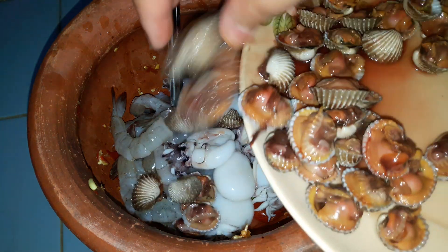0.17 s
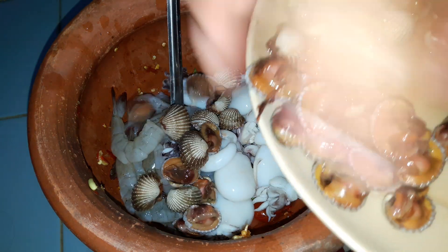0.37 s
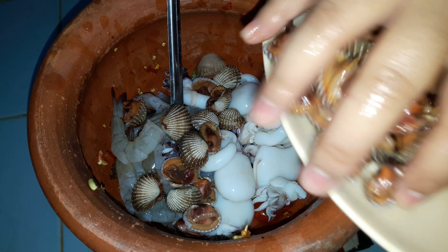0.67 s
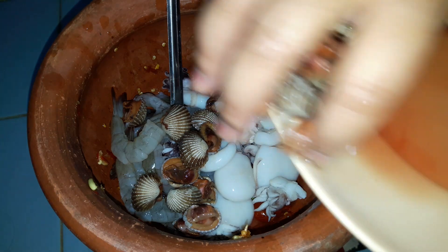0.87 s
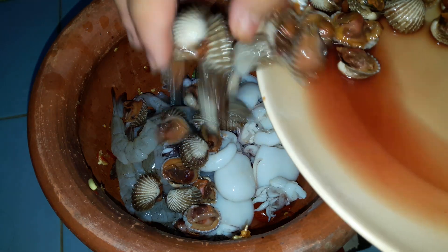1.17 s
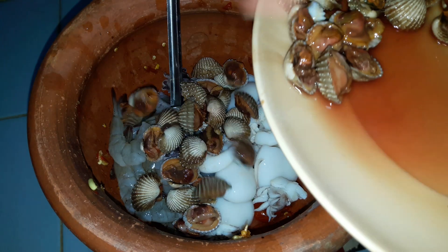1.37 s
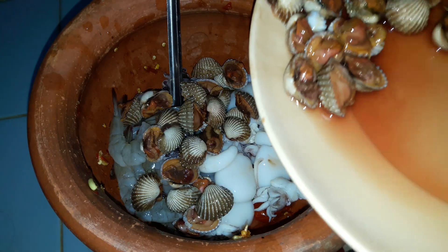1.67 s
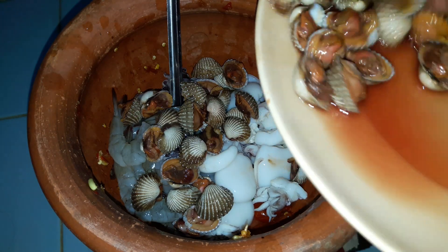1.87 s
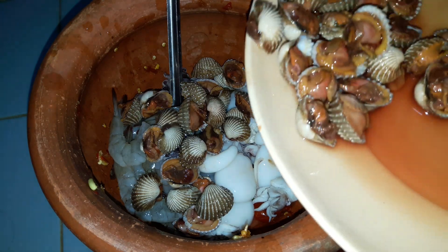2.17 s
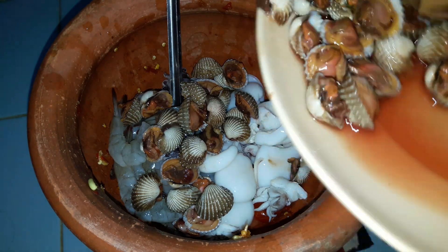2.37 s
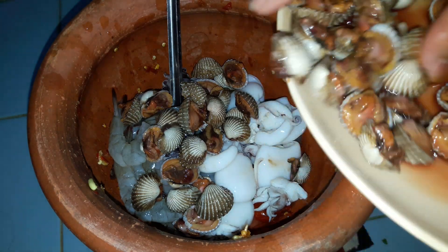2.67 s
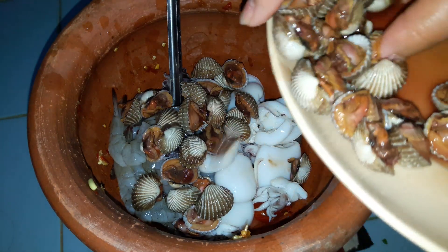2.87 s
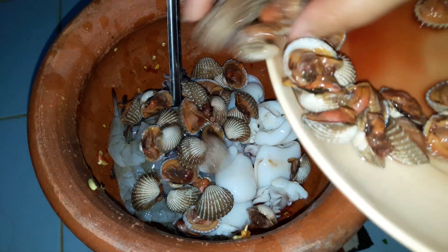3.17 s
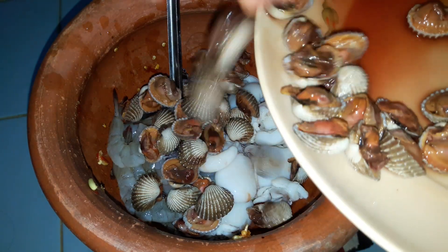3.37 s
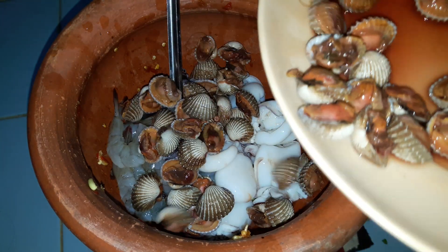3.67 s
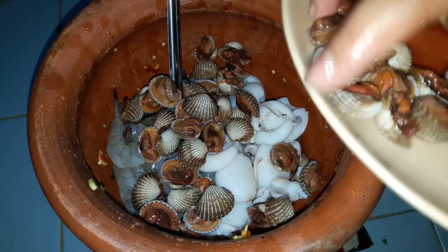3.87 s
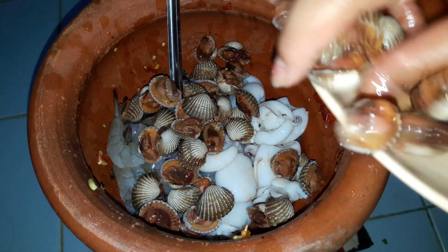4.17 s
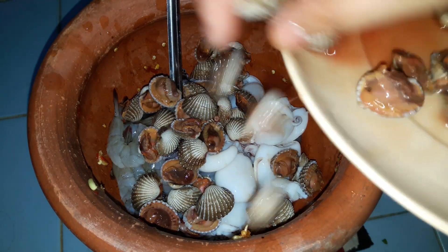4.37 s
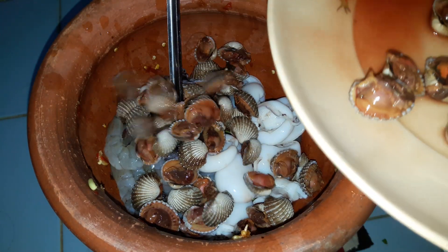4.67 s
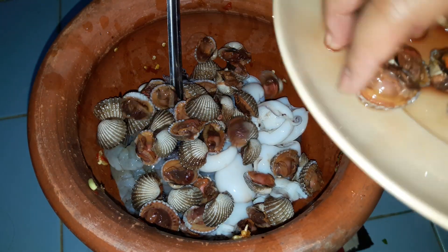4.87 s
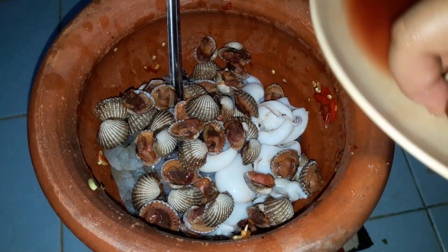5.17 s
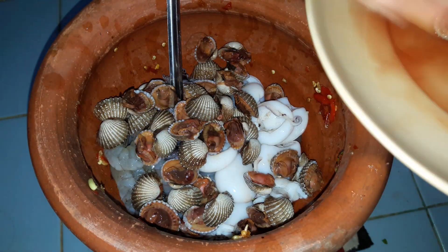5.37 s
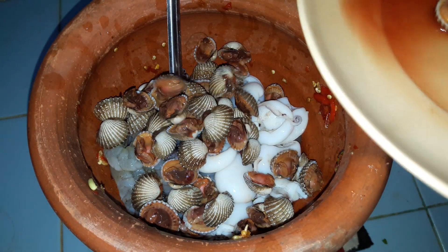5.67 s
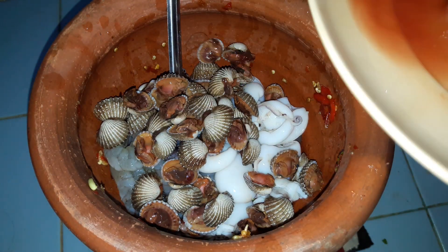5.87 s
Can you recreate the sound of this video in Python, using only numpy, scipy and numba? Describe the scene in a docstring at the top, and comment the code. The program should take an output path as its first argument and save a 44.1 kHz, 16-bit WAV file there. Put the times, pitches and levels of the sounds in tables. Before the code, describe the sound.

Cockles in their shells are pushed off a ceramic plate into a clay mortar in a small kitchen. The sliding heap rattles and knocks dully on the plate, while falling handfuls clack brightly on other shells to the left. The clatter comes in several bursts with sliding between them, thinning near the end. A few landings thump the close left microphone, over a short echo and a faint low rumble.

```python
"""In a small kitchen, cockles in their shells are pushed off a ceramic plate into a clay mortar.
Sliding shells rattle and knock on the plate (dull, slightly right) and clack on each other in the
mortar (bright, to the left). Each hit is a handful of fading tones; hard hits add a crack of noise.
One shell clack leaves a faint, high ring near 9 kHz, and a few landings jolt the left microphone.
The bowl and walls add a short echo, and a low rumble lies underneath."""
import sys
import numpy as np
from scipy import signal
from scipy.fft import rfft, irfft
from scipy.io import wavfile
from numba import njit

SR = 44100
rng = np.random.default_rng(int(sys.argv[2]) if len(sys.argv) > 2 else 0)


def generate_wav(signal):
    """Clip the signal to [-1, 1] and save it as 16-bit WAV at the path in sys.argv[1]."""
    frames = np.transpose(np.atleast_2d(signal))
    scaled = np.clip(frames, -1, 1) * 32767
    pcm = np.round(scaled).astype(np.int16)
    wavfile.write(sys.argv[1], SR, pcm)


N = 265878


def from_db(db):
    """Turn decibels into a number to multiply by."""
    return 10 ** (np.asarray(db) / 20)


def rms_one(x):
    """Scale a sound so that its average strength (rms) is 1."""
    return x / np.sqrt(np.mean(x ** 2) + 1e-20)


def to_samples(seconds):
    """Turn seconds into sample numbers."""
    return (seconds * SR).astype(np.int64)


def only(x, side, hz, order=2):
    """Keep the "low" or the "high" side of a sound, split at hz."""
    return signal.sosfilt(signal.butter(order, hz, side, fs=SR, output="sos"), x)


@njit
def add_tones(out, at, size, turn, fade, phase, rise):
    """Add one tone per hit, pitch and side. It swells during the contact, then fades away."""
    for hit in range(size.shape[0]):
        for tone in range(size.shape[1]):
            step = fade[tone] * np.exp(1j * turn[hit, tone])
            end = min(out.shape[1], at[hit, tone] + int(-5.0 / np.log(fade[tone])))  # 43 dB down
            for side in range(2):
                wave = size[hit, tone, side] * np.exp(1j * phase[hit, tone, side])
                held_back = 1.0
                for n in range(at[hit, tone], end):
                    held_back *= rise
                    out[side, n] += wave.imag * (1 - held_back)
                    wave *= step


PLATE_LAG_S, MORTAR_LAG_S = 0.000413, -0.00011  # how much later the left side hears each place


def strike(tones, start_s, level_db, left_db, lag_s, chatter_s, contact_s, spread_db, detune,
           pitch_hz=None):
    """Each hit meets a new spot and load of shells, so its tones vary. left_db is left minus right."""
    hz, tone_db, ring_s = np.transpose(tones)  # ring_s is the time to fade by 60 dB
    chance = rng.standard_normal((len(start_s), len(hz), 5))
    hz = np.minimum(hz * (1 + detune * chance[..., 0]), .45 * SR)
    tone_db = tone_db + spread_db * chance[..., 1]
    if pitch_hz is not None:  # the struck spot brings out one pitch and its neighbours
        distance = np.abs(np.log(hz / pitch_hz[:, None]))
        nearest = distance == distance.min(axis=1, keepdims=True)
        hz = np.where(nearest, pitch_hz[:, None], hz)
        tone_db = tone_db + 4 * np.exp(-(distance / .35) ** 2) + 3.5 * nearest
    size = from_db(tone_db)
    size *= from_db(level_db)[:, None] / np.sqrt(np.sum(size ** 2, axis=1, keepdims=True))
    at = to_samples(start_s[:, None] + chatter_s * chance[..., 2] ** 2)  # shell ribs touch in turn
    # Higher tones reach the two sides more out of step, and lean further left.
    out_of_step = hz / 1750 * chance[..., 3] - 2 * np.pi * np.maximum(hz - 613, 0) * lag_s
    phase = 2 * np.pi * chance[..., 4:] + out_of_step[..., None] * [.5, -.5]
    left_db = left_db[:, None] + 1.5 * np.log2(hz / np.median(hz))
    size = size[..., None] * from_db(left_db[..., None] * [.5, -.5])
    out = np.zeros((2, N))
    add_tones(out, at, size, turn=2 * np.pi * hz / SR, fade=from_db(-60 / (ring_s * SR)),
              phase=phase, rise=np.exp(-1 / (contact_s * SR)))
    return out


def crack(start_s, level_db, left_db, top_hz=8900, fade_s=0.0097):
    """Hard things meet with a dry crack: bright noise that dies at once."""
    hits = np.zeros((2, N))
    hits[:, to_samples(start_s)] = from_db(level_db + left_db * [[.5], [-.5]])
    fade = from_db(-60 / (fade_s * SR))
    bursts = signal.lfilter([1], [1, -fade], hits + 1e-18) * rng.standard_normal((2, N))
    return only(only(bursts, "high", 2500), "low", top_hz)


def touches(per_s, left_db, uneven_db):
    """Small random touches, a few of them strong: their start_s, level_db and left_db."""
    at = np.flatnonzero(rng.random(N) < per_s / SR)
    return at / SR, uneven_db * np.minimum(rng.exponential(1, len(at)), 3), left_db[at]


def surges(rows, rise_s=.006, fall_db_per_s=266, hop=32):
    """Bursts start fast, drift and die. Gives their total strength and the loudest one's other columns."""
    start_s, length_s, db, drop_db, *others = np.transpose(rows)[..., None]
    age_s = np.arange(0, N, hop) / SR - start_s
    db = db - drop_db * np.clip(age_s / length_s, 0, 1)
    db -= fall_db_per_s * np.maximum(age_s - length_s, 0)
    gain = from_db(db) * np.clip(1 + age_s / rise_s, 0, 1)
    loudest = gain.argmax(axis=0)
    curves = [gain.sum(axis=0)] + [column[loudest, 0] for column in others]
    return [np.repeat(curve, hop)[:N] for curve in curves]


# How strong the rumble is from low to high: pitch_hz, relative_db
RUMBLE_COLOUR = [(24, -48), (40, -19), (117, 0.5), (224, -8), (325, -9.5), (591, -13), (704, -9.5),
                 (1380, -88), (2640, -13.5), (15500, -103)]
# How loud the rumble is over time: time_s, level_db
RUMBLE_LEVELS = [(0, -54), (2.0, -60), (2.2, -66), (2.8, -62.5), (2.9, -50), (3.25, -54.5), (3.35, -59),
                 (4.3, -65.5), (6.03, -64)]


def rumble():
    """Low kitchen noise that swells and sinks, nearly the same on both sides in the bass."""
    hz = np.arange(N // 2 + 1) * SR / N + 1
    pitch_hz, relative_db = np.transpose(RUMBLE_COLOUR)
    colour = from_db(np.interp(np.log(hz), np.log(pitch_hz), relative_db))
    both, apart = rfft(rng.standard_normal((2, N))) * colour
    apart *= np.sqrt(0.05 + (hz / 900) ** 2) / np.sqrt(1 + (hz / 900) ** 2)
    level_db = np.interp(np.arange(N) / SR, *np.transpose(RUMBLE_LEVELS))
    return from_db(level_db) * rms_one(irfft([both + apart, both - apart], N))


# The tones the plate rings with: pitch_hz, relative_db, ring_s
PLATE_TONES = [(346, -15.5, 0.019), (478, -17, 0.035), (708, -9, 0.035), (792, -6, 0.043),
               (938, -5.5, 0.053), (1160, -1.5, 0.031), (1271, -1.5, 0.031), (1538, 2, 0.032),
               (1740, 5, 0.019), (1950, 2, 0.041), (2216, 0, 0.014), (2413, 12.5, 0.0094),
               (2526, -1, 0.029), (2740, -2, 0.034), (3179, 1.5, 0.016), (3286, 7.5, 0.0033),
               (3846, -2.5, 0.022), (4320, -6, 0.03), (5190, -2.5, 0.011), (7130, -2.5, 0.0055),
               (10060, -15, 0.0046)]
# Slides of the heap: start_s, length_s, level_db, drop_db, left_db, pitch_hz, ticks_quieter_db
SLIDES = [(0.0, 0.24, -26, 9, 0.5, 2310, 15.5), (.575, 0.13, -37.5, 2.5, -2, 1496, 17),
          (.73, 0.38, -40, -2.5, -0.5, 2586, 10), (1.16, 0.26, -40.5, 9.5, 1, 2705, 11),
          (1.52, 0.14, -70, -4, 2, 2400, 2.5), (1.69, 0.3, -32, -0.5, -1, 1300, 12),
          (2.03, 0.21, -33.5, 17.5, -1.5, 947, 20), (2.26, .1, -50.5, 1, -1.5, 965, 23),
          (2.385, .3, -33, 0.5, -0.5, 963, 10.5), (2.7, 0.22, -33.5, 4.5, -0.5, 960, 12),
          (3.01, 0.27, -32, -4.5, -1, 2500, 12.5), (3.35, 0.34, -34, 6.5, 0, 2280, 13),
          (3.75, 0.1, -40, 6, -3.5, 2400, 26), (3.85, .16, -28, 8, -0.5, 2270, 13),
          (4.072, 0.28, -34, -1.5, -2, 2390, 13.5), (4.39, 0.47, -33, 10.5, 0.5, 2500, 14),
          (4.92, 0.085, -42.5, -2, -1, 1226, 22), (5.03, 0.26, -30.5, 10.5, -2.5, 2350, 27.5),
          (5.385, 0.05, -36.5, 2.5, -2.5, 2390, 42), (5.51, 0.11, -41, 13, -3.5, 1310, 34),
          (5.63, 0.18, -40, 9, 3, 1210, 8), (5.85, 0.17, -55, -16, -4, 1210, 20)]


def plate_rattle():
    """The sliding heap taps the plate so often that the taps blur into a rattle."""
    slide, left_db, slide_hz, _ = surges(SLIDES)
    start_s, level_db, left_db = touches(1300, left_db, uneven_db=6.5)
    pitch_hz = slide_hz[to_samples(start_s)] * (1 + .08 * rng.standard_normal(len(start_s)))
    rattle = strike(PLATE_TONES, start_s, level_db, left_db, PLATE_LAG_S, chatter_s=.001,
                    contact_s=.00034, spread_db=5.5, detune=.0693, pitch_hz=pitch_hz)
    return slide * rms_one(rattle)


# The tones a shell rings with: pitch_hz, relative_db, ring_s
SHELL_TONES = [(1270, 6, 0.0034), (2145, -5, 0.014), (3368, 0.5, 0.02), (4220, 0.5, 0.0062),
               (4680, -2, 0.016), (6090, -2, 0.018), (6260, -11.5, 0.0055), (7750, -5.5, 0.0037),
               (8200, -2, 0.033), (8755, -3, 0.019), (9730, -12, 0.033), (10720, 5.5, 0.005),
               (11890, -0.5, 0.013), (13230, -5, 0.0056), (13660, -3.5, 0.0052), (14700, 13.5, 0.00061)]
# Handfuls scattering in the mortar: start_s, length_s, level_db, drop_db, left_db
HANDFULS = [(0.0, .42, -38.5, 7.5, 0), (1.17, .13, -44.5, -1, 2), (1.315, 0.088, -33.5, 8, 5),
            (3.24, 0.084, -39.5, 2, 0), (3.365, 0.078, -32, 7.5, 3.5), (3.48, .16, -46.5, 2, 4.5),
            (4.46, 0.06, -42, 10, 12), (4.68, 0.18, -56, -4, 4), (5.69, 0.079, -37.5, 14.5, -0.5)]


def shell_ticks():
    """Thin shells tick against each other as they slide on the plate and scatter in the mortar."""
    slide, plate_left_db, _, quieter_db = surges(SLIDES)
    slide = slide * from_db(-quieter_db)
    scatter, mortar_left_db = surges(HANDFULS)
    ticks = touches(450, np.where(scatter > slide, mortar_left_db, plate_left_db), uneven_db=7)
    ring = strike(SHELL_TONES, *ticks, MORTAR_LAG_S, chatter_s=.00059,
                  contact_s=.00036, spread_db=1.5, detune=.081)
    ticking = rms_one(ring) + from_db(.5) * rms_one(crack(*ticks))
    return (slide + scatter) * rms_one(ticking)


# Shell landing on shell: start_s, level_db, pitch_hz, left_db
CLACKS = [(0.0034, -13, 9230, 9), (0.0211, -10, 5900, 1.5), (0.1192, -7, 12450, 5), (0.162, -9.5, 11200, 8),
          (0.1653, -8, 6300, 3), (0.2258, -13, 11700, 11), (0.286, -13.5, 7100, 9), (0.308, -24, 4500, 6),
          (0.3202, -11.5, 10140, 5.5), (0.3461, -15, 9600, 9), (0.3602, -12, 9060, 12.5),
          (0.4823, -27.5, 9430, 14.0), (0.5546, -30.5, 10000, 13), (1.1705, -20, 4440, 7.0),
          (1.2042, -29, 10800, 16), (1.2228, -16, 4550, -0.5), (1.2655, -12.5, 9500, 6.5),
          (1.3144, -18, 5740, 7.0), (1.3196, -9.5, 5600, 7.0), (1.3397, -12.5, 10400, 6),
          (1.3475, -12, 10900, 7), (1.3654, -12, 10700, 7), (1.3872, -13.5, 8940, 9),
          (1.4341, -24, 11500, 5.5), (1.9944, -16, 8200, -0.5), (2.5363, -20, 8200, 2),
          (3.018, -20.5, 13900, 10.0), (3.048, -15.5, 8560, 2), (3.1572, -12, 5200, 0),
          (3.258, -11.5, 4910, 4), (3.2822, -20, 11500, 5.0), (3.2997, -11.5, 10000, 8),
          (3.3664, -10, 11700, 7), (3.3722, -10, 8400, 1), (3.383, -4, 11100, 11),
          (3.3923, -14, 11300, 4.5), (3.4829, -11.5, 12000, 7.0), (3.5168, -11.5, 9000, 10.0),
          (3.5609, -11.5, 8470, 8.5), (3.6229, -16, 10900, 13), (3.6386, -21, 10000, 10),
          (3.689, -22.5, 8950, 7.5), (4.2782, -23, 8300, 3), (4.358, -17, 5000, -1),
          (4.4862, -13.5, 7000, -9), (4.5083, -13, 4590, 8), (4.5324, -11, 11500, 3),
          (4.5544, -11, 10100, 5.5), (4.6773, -49, 5070, -2), (4.6958, -9, 7150, 5.0),
          (4.7311, -9.5, 11400, 8), (4.746, -11, 10400, 3), (4.7625, -9, 11200, 7.0),
          (4.8474, -19, 10800, 4), (4.9173, -23.5, 5860, 6), (4.9671, -25, 8400, 5),
          (5.1739, -23.5, 8700, 1), (5.6259, -10, 5650, 0), (5.6915, -11.5, 11100, 8.5),
          (5.7044, -13, 12200, 10), (5.713, -9, 8340, 5)]


def shell_clacks():
    """One shell hits another in the mortar with a bright crack and a short ring."""
    start_s, level_db, pitch_hz, left_db = np.transpose(CLACKS)
    ring = strike(SHELL_TONES, start_s, level_db, left_db, MORTAR_LAG_S, chatter_s=.00065,
                  contact_s=.0001, spread_db=2.5, detune=.088, pitch_hz=pitch_hz)
    return ring + crack(start_s, level_db - 9, left_db, top_hz=15000)


# Shells knocking on the plate: start_s, level_db, pitch_hz
KNOCKS = [(0.01, -14, 2240), (0.051, -11.5, 2540), (0.087, -11, 2400), (0.165, -19, 1230),
          (0.187, -10, 2700), (0.196, -7.5, 2720), (0.245, -16, 2550), (0.484, -35, 2740),
          (0.574, -19, 1465), (0.593, -19, 1540), (0.601, -13.5, 1500), (0.621, -21, 1520),
          (0.65, -12.5, 2500), (0.73, -27, 1470), (0.77, -20, 2400), (0.834, -21, 2710),
          (0.951, -19.5, 2430), (0.999, -24, 2650), (1.039, -16.5, 2410), (1.054, -13, 2314),
          (1.084, -12, 2420), (1.232, -12.5, 2800), (1.247, -11, 3210), (1.319, -22, 3020),
          (1.402, -29, 2070), (1.434, -26.5, 1984), (1.515, -28, 2300), (1.566, -31.5, 2800),
          (1.683, -25, 1020), (1.716, -7, 930), (1.735, -6.5, 1630), (1.773, -15, 1280), (1.802, -17, 1240),
          (1.835, -11.5, 1550), (1.961, -10.5, 2680), (1.994, -13.5, 2020), (2.155, -16.5, 939),
          (2.228, -4, 2420), (2.383, -10.5, 2680), (2.396, -12, 2290), (2.425, -11.5, 945),
          (2.444, -10, 2390), (2.466, -9.5, 1030), (2.482, -12.5, 1530), (2.539, -9, 2430),
          (2.576, -17, 2590), (2.595, -17, 2340), (2.703, -12, 2700), (2.752, -16, 2420), (2.8, -9, 1970),
          (2.818, -15, 1120), (2.865, -18.5, 953), (2.914, -18, 905), (3.029, -26, 1740),
          (3.063, -11.5, 3140), (3.078, -10.5, 3200), (3.093, -11.5, 2620), (3.141, -6.5, 2660),
          (3.167, -13, 2610), (3.237, -18, 2130), (3.346, -12.5, 2370), (3.413, -9.5, 2060),
          (3.451, -10, 2330), (3.482, -13, 2440), (3.625, -15, 1230), (3.708, -25, 1480),
          (3.817, -28, 2390), (3.853, -21, 2500), (3.872, -12.5, 2000), (3.889, -8.5, 2730),
          (4.047, -24, 2730), (4.075, -12.5, 1575), (4.107, -20, 2750), (4.192, -14.5, 3100),
          (4.223, -15, 2140), (4.246, -14.5, 3210), (4.28, -11.5, 2830), (4.392, -1.5, 2500),
          (4.419, -9.5, 2430), (4.463, -8, 2550), (4.484, -8.5, 2480), (4.625, -14.5, 2350),
          (4.734, -18, 2680), (4.917, -23.5, 1170), (4.963, -22.5, 1300), (5.007, -19.5, 2552),
          (5.042, -17, 2540), (5.077, -14, 2480), (5.385, -33, 2560), (5.402, -33, 2340),
          (5.547, -25, 1270), (5.575, -23, 931), (5.625, -4.5, 2840), (5.709, -15, 1210),
          (5.851, -26.5, 1270), (5.882, -19.5, 1160), (5.946, -16.5, 1200), (5.969, -19.5, 1250),
          (5.992, -9.5, 2450)]


def plate_knocks():
    """A shell knocks where the heap is sliding: the plate rings, with a faint, duller crack."""
    start_s, level_db, pitch_hz = np.transpose(KNOCKS)
    _, heap_left_db, _, _ = surges(SLIDES)
    left_db = heap_left_db[to_samples(start_s)]
    ring = strike(PLATE_TONES, start_s, level_db, left_db, PLATE_LAG_S, chatter_s=.0014,
                  contact_s=.0003, spread_db=2, detune=.05, pitch_hz=pitch_hz)
    return ring + crack(start_s, level_db - 18.5, left_db)


# The high tones that linger after a clack: pitch_hz, relative_db, ring_s
CLACK_RING_TONES = [(8600, -5, .16), (8790, -2, .18), (8920, -2, .2), (9010, 0, .2), (9170, -2, .18),
                    (9400, -4, .16)]
# The clack that leaves them: start_s, level_db, left_db
RINGING_CLACKS = [(0.3586, -33, 9)]


def clack_ring():
    """One shell clack leaves a faint, high ring near 9 kHz."""
    return strike(CLACK_RING_TONES, *np.transpose(RINGING_CLACKS), MORTAR_LAG_S, chatter_s=0,
                  contact_s=.00028, spread_db=1.5, detune=0)


# Landings that jolt the microphone: start_s, level_db
JOLTS = [(0.3606, -7.5), (1.319, -28.5), (3.517, -30), (3.838, -41), (4.695, -22.5)]


def jolts(push_s=.0006):
    """A short push on the left microphone makes a thump that barely reaches the right one."""
    start_s, level_db = np.transpose(JOLTS)
    pushes = np.bincount(to_samples(start_s), -from_db(level_db), N)
    age = np.arange(int(.0074 * SR)) / SR / push_s
    thumps = np.convolve(pushes, age * np.exp(1 - age))[:N]
    return only(thumps, "high", 75) * from_db([[0], [-32]])


def kitchen_echo(x, level_db=-11, rise_s=.0022, fade_s=.17):
    """The mortar bowl and hard walls throw back a short, duller echo, alike on both sides in the bass."""
    t = np.arange(int(.4 * SR)) / SR
    both, apart = rng.standard_normal((2, len(t)))
    apart = only(apart, "high", 1100, order=3)
    shape = from_db(-60 * t / fade_s) * np.minimum(t / rise_s, 1)
    tail = only((both + apart * [[1], [-1]]) * shape, "low", 6500, order=1)
    return from_db(level_db) * signal.fftconvolve(x, rms_one(tail) / np.sqrt(len(t)), axes=1)[:, :N]


def scene():
    """Plate and shells with their echo, plus the jolts and the rumble."""
    near = plate_rattle() + shell_ticks() + shell_clacks() + plate_knocks() + clack_ring()
    near = only(near, "high", 300)  # small things give off no bass
    return near + kitchen_echo(near) + jolts() + rumble()


def record(dry):
    """Round off the loudest peaks and cut the very highest treble."""
    rounded = .9 * np.tanh(dry / .5)
    return signal.sosfilt(signal.cheby2(14, 80, 16800, fs=SR, output="sos"), rounded)


dry = scene()
out = record(dry)
generate_wav(out)
```